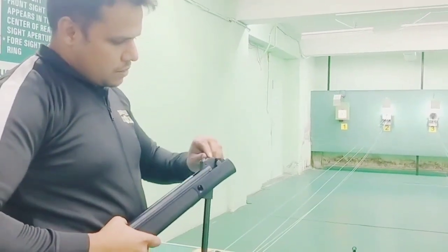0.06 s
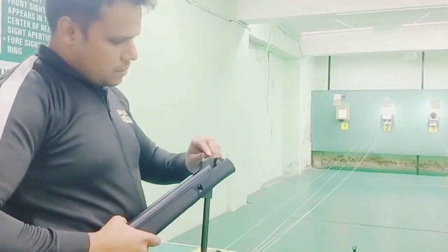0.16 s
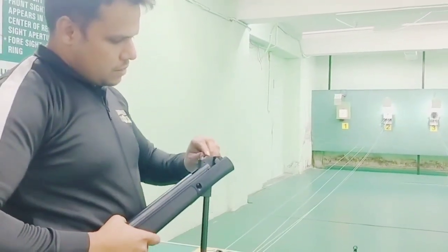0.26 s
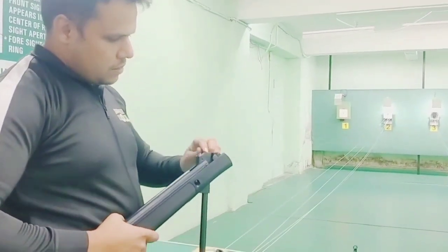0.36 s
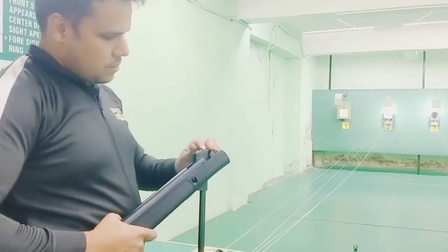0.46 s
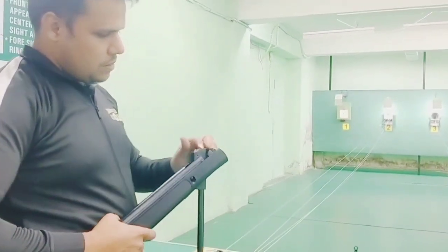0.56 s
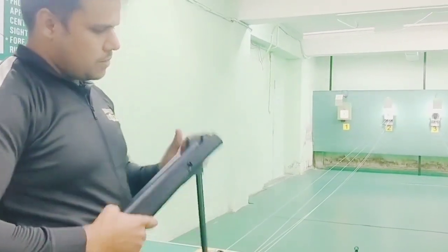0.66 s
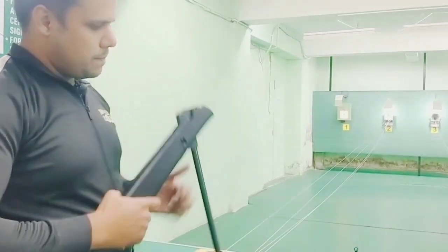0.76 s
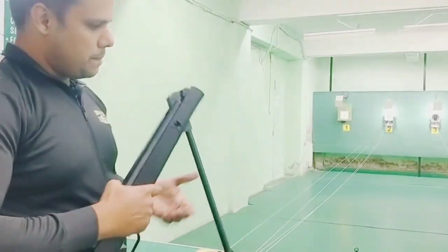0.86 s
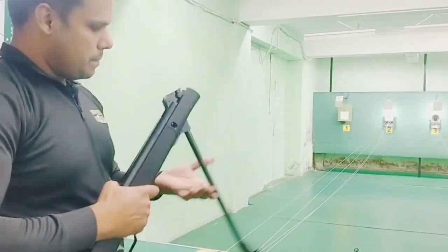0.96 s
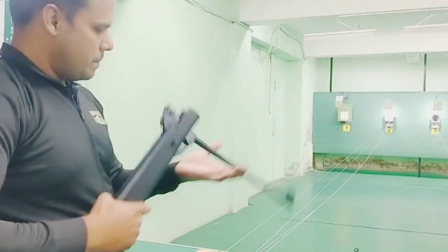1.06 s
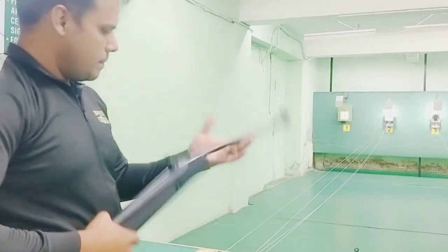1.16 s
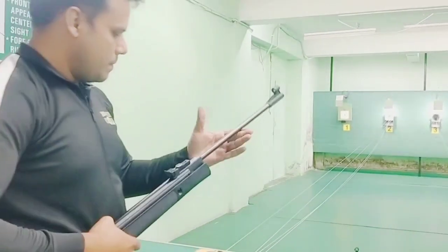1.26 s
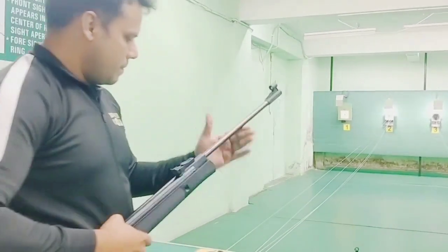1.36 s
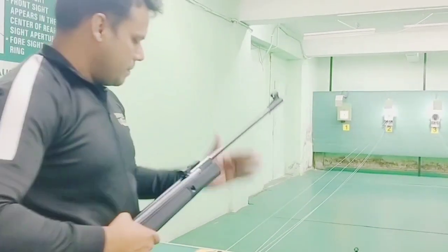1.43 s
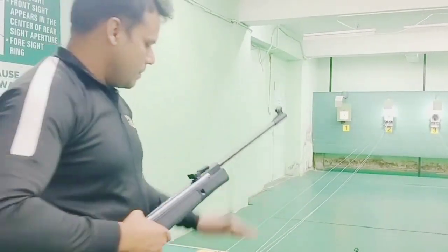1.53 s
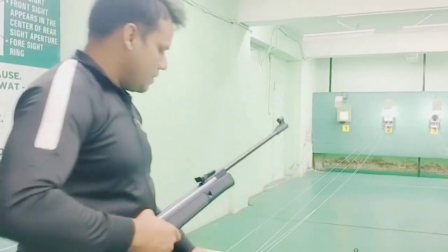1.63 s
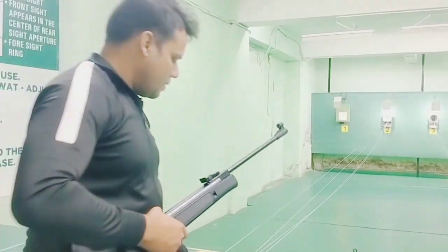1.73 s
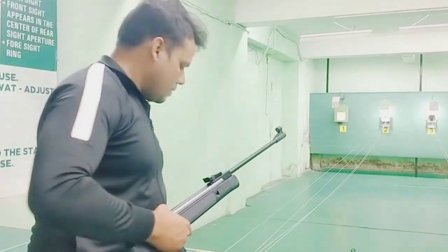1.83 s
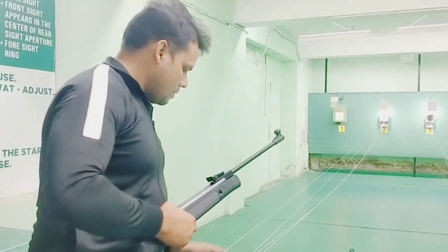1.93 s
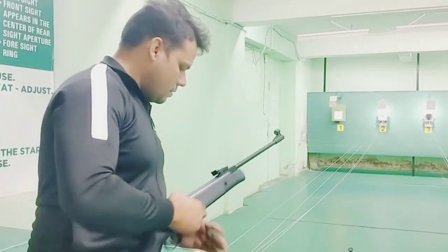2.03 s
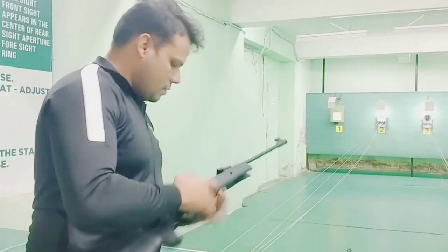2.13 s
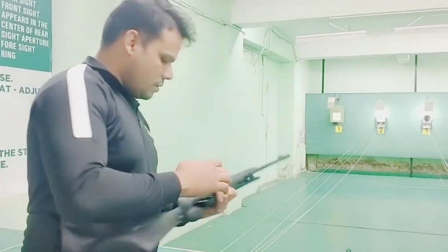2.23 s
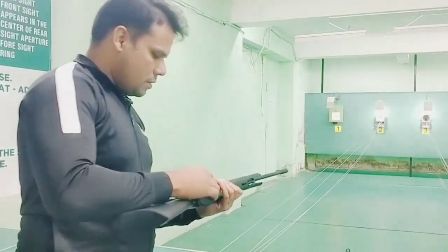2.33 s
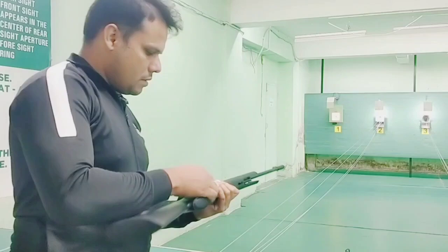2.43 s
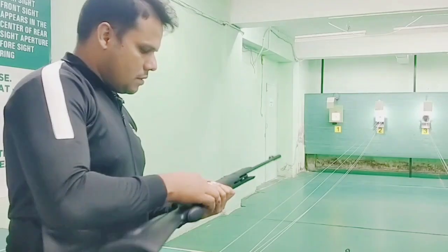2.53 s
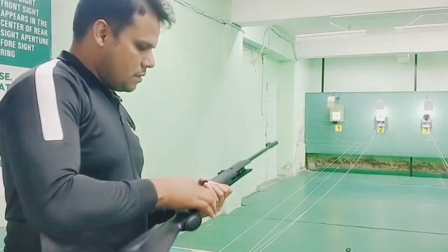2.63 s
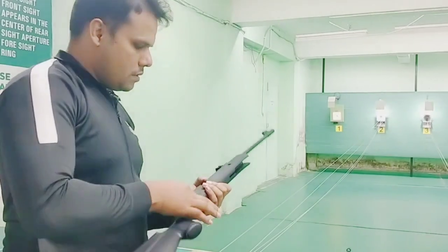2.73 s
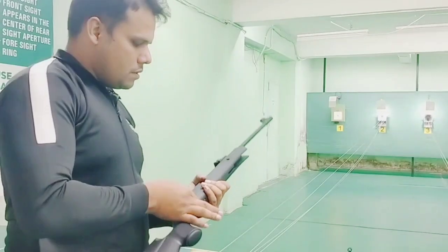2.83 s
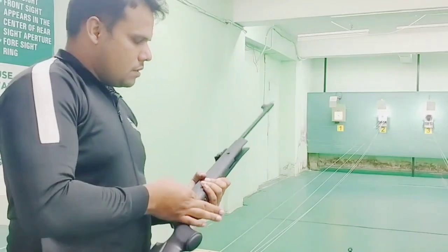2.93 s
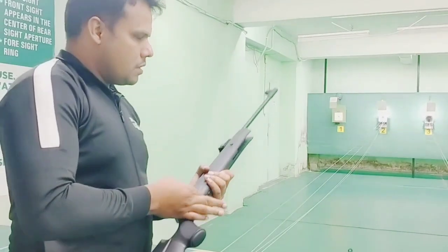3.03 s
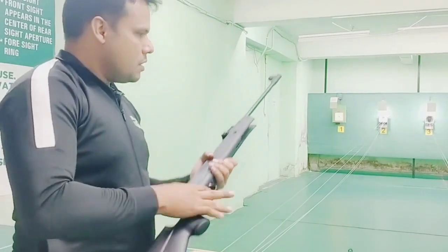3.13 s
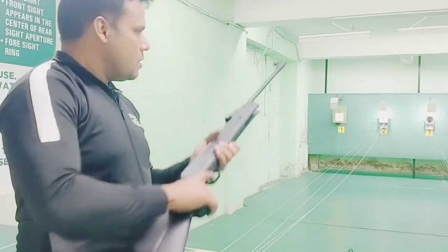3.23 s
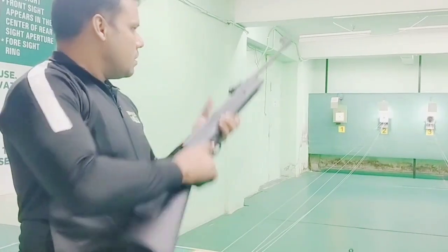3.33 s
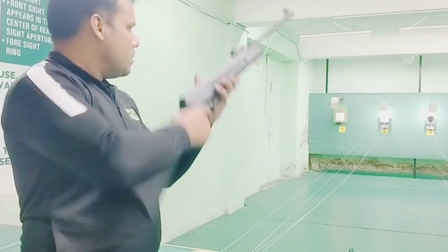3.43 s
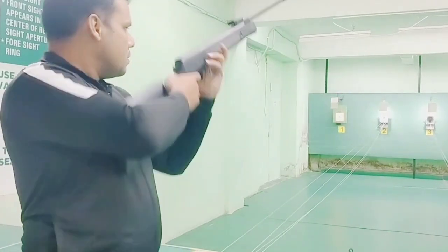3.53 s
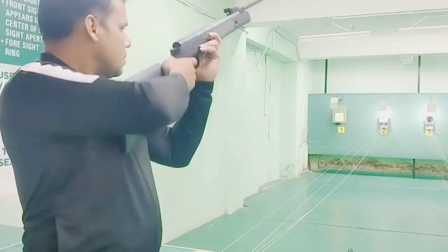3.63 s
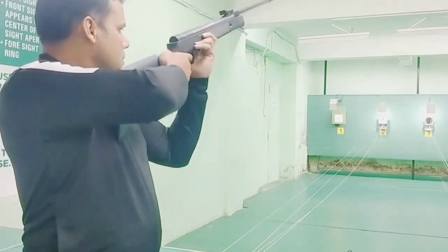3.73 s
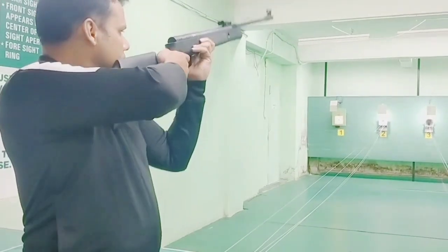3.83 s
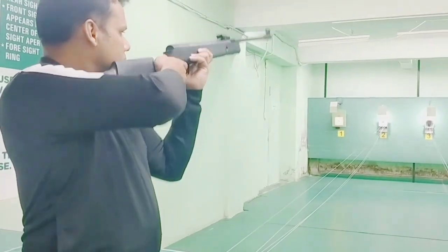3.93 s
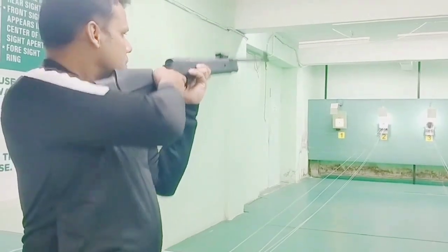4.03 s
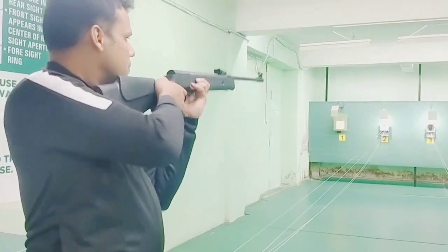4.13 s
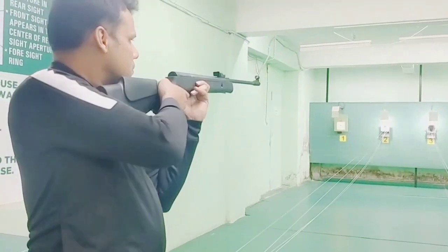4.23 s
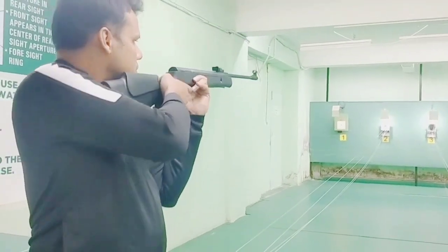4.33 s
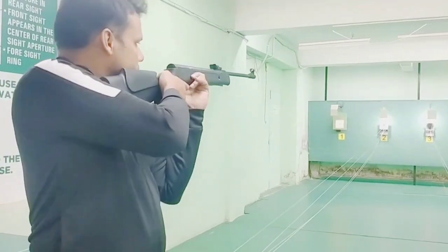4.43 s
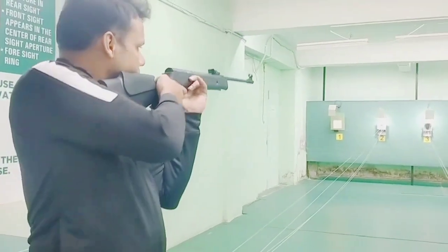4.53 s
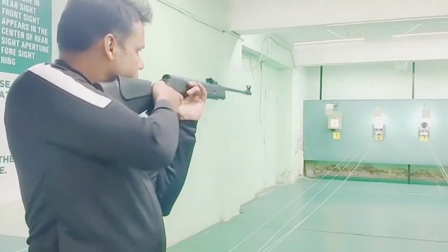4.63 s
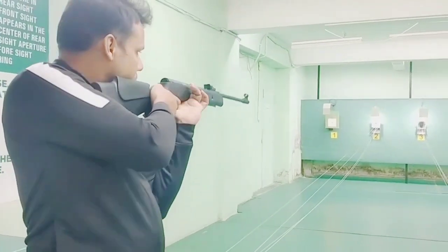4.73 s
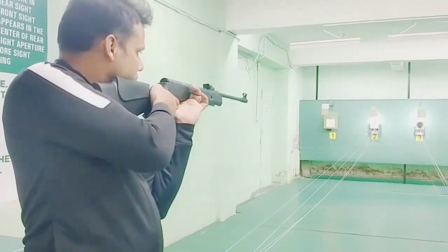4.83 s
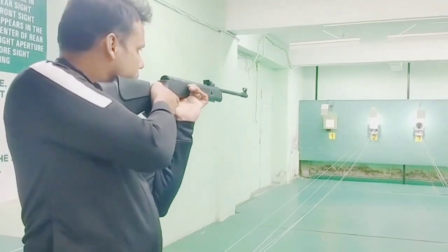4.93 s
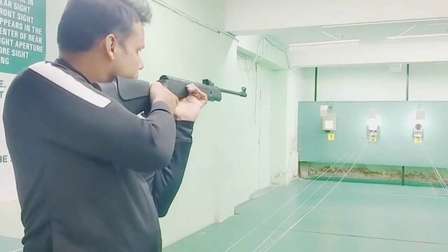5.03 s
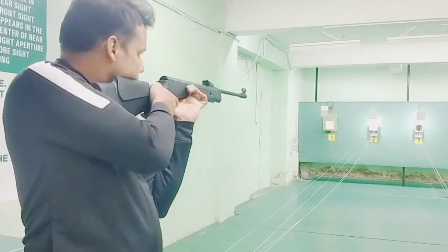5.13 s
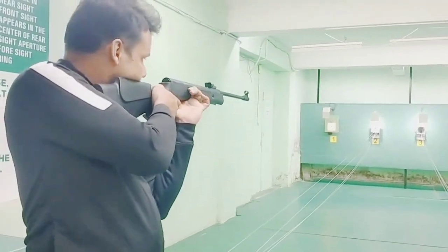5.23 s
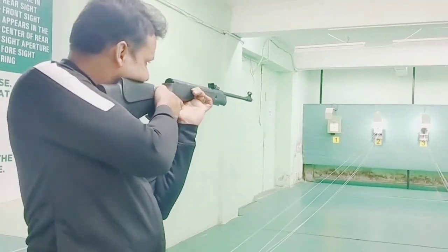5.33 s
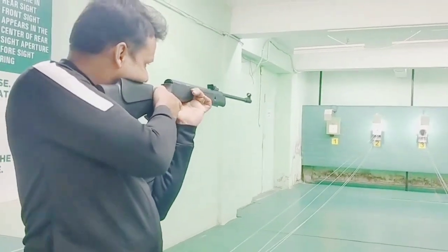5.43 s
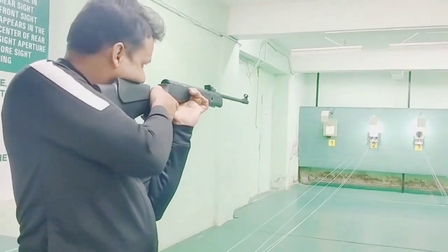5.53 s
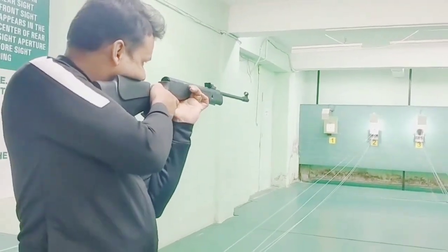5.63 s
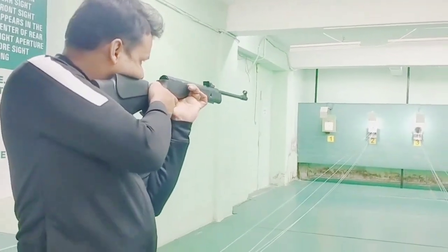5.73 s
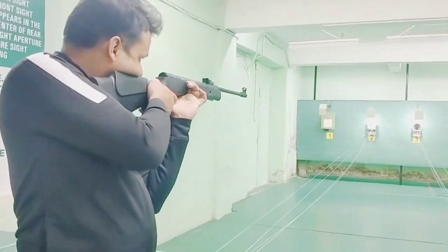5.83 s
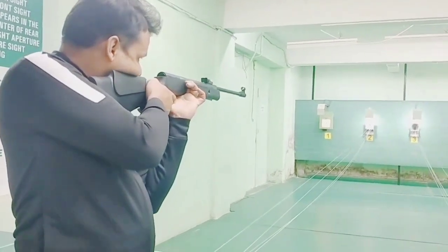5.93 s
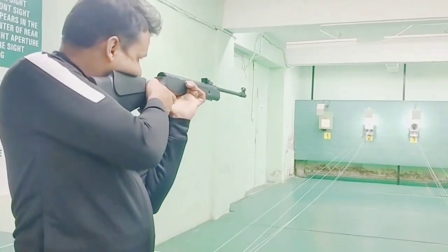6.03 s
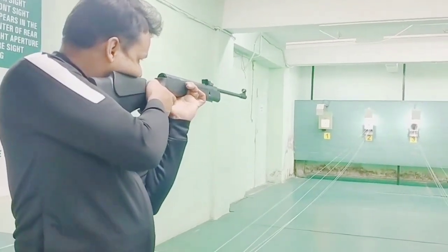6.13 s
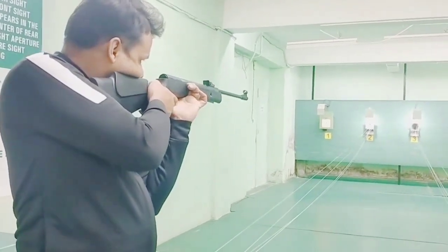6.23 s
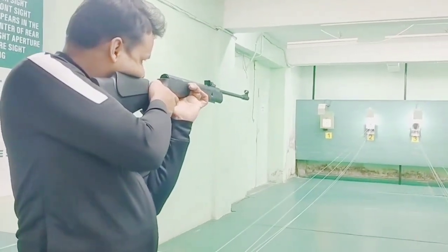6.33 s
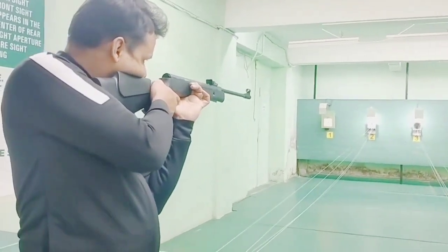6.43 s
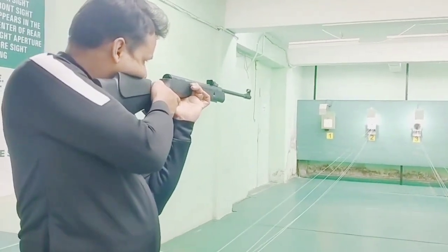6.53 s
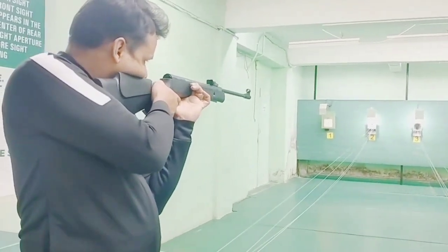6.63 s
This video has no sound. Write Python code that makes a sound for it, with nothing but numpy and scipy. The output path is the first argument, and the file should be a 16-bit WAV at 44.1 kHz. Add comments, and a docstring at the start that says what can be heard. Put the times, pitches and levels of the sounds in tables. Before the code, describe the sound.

A break-barrel air rifle snaps shut with a loud steel clack ringing through a bare hall, then a catch clicks and small sight clicks follow over throbbing fan hum.

```python
"""Over throbbing fans, motor hum and rushing air, a break-barrel spring air rifle is handled in a bare range.
Sleeves rustle and fittings tick, then the hinge squeaks (stick-slip pulses), the latch grinds (noise bursts)
and the barrel slams shut (cracks and chatter rung through steel resonances). A catch clicks, the stock bumps
the chest and fingers turn the rear sight four notches. Hands knock and slide on the stock throughout. Decaying
noise gives the handling sounds and the long ring of the hall, which sounds after all of them but the chest
bumps."""
import sys
import numpy as np
from scipy import signal
from scipy.fft import rfft, irfft
from scipy.io import wavfile

SR = 44100
rng = np.random.default_rng(int(sys.argv[2]) if len(sys.argv) > 2 else 0)


def materialize(psi):
    """Save the field psi as 16-bit PCM at rate SR to the path in sys.argv[1].

    A 1-D psi becomes a single channel; in a 2-D psi each row is a channel.
    """
    bounded = np.clip(np.atleast_2d(psi).T, -1, 1)
    quanta = np.round(bounded * 32767).astype(np.int16)
    wavfile.write(sys.argv[1], SR, quanta)


N = 294100
TIME = np.arange(N) / SR   # s

# All tilts act above 500 Hz. Body spectra are relative: each response is scaled to an energy of 1.
# Barrel meeting latch and breech: [t/s, level/dB, tilt/(dB/octave)]
LATCH_BLOWS = [(1.1595, -45, -2.5), (1.1651, -35, 2), (1.2951, -42, 2.5), (1.3125, -20, 2),
               (1.3194, -25, -0.5), (1.3264, -25, -0.5), (1.3334, -13, 2.5), (1.3411, -19.5, 2),
               (1.3644, -24, 0.5)]
# Tone of the whole rifle under a blow: [f/Hz, level/dB]
RIFLE_BODY = [(120, -11.5), (220, -19.5), (320, -4.5), (480, -3.5), (630, -9), (950, 0.5), (1800, -1.5),
              (2800, 0.5), (3300, -9.5), (4200, -7.5), (8200, -9), (9700, -17.5), (13000, -21),
              (15500, -16.5)]
# Steel resonances of the rifle: [f/Hz, width/Hz, peak/dB]
RIFLE_MODES = [(477, 52, 4.6), (880, 20, 4.4), (940, 18, 4), (1263.7, 20, 6.5), (1327, 20, 5),
               (1460, 20, 2.9), (1510, 30, 3.1), (1802, 13, 6), (1949, 25, 7.1), (2040, 28, 2.7),
               (2226, 90, 6.5), (2350, 66, 2.5), (2910, 21, 5.5), (8000, 210, 1.7)]
# Rings of the latch while it grinds over its ramp: [f/Hz, width/Hz, peak/dB]
RAMP_MODES = [(1480, 90, 8.5), (2443, 350, 9.5), (6900, 330, 3.5)]
# What the hinge radiates: [f/Hz, level/dB]
HINGE_BODY = [(400, -10.5), (1000, -10.5), (2400, -3.5), (3200, 0), (4500, -3), (6000, -5), (7000, 0),
              (8500, -12), (10000, -17), (11500, -14), (13000, -25), (15500, -24)]
# Catch snapping over: [t/s, level/dB, tilt/(dB/octave)]
CATCH_BLOWS = [(3.0634, -26, .5), (3.0697, -31, 1.5), (3.0842, -35, 7), (3.1040, -39, 2)]
# Tone of the catch: [f/Hz, level/dB]
CATCH_BODY = [(200, -14), (450, -15), (850, -21), (1400, -10), (1900, -14.5), (2700, -6.5), (4250, -1.5),
              (4900, -15.5), (6000, -9), (8800, -11.5), (11500, -14), (13500, -18), (15500, -27)]
# Resonances of the catch: [f/Hz, width/Hz, peak/dB]
CATCH_MODES = [(850, 89, 9.2), (2144, 140, 7.5), (2716, 260, 12.3), (2940, 96, 1.8), (3680, 260, 6.6),
               (4300, 73, 1.9), (5880, 590, 11.5), (7540, 250, 7.1), (11000, 600, 4.6)]
# Notches of the rear sight's wheel, alike but for the part that rings most: [t/s, main ring f/Hz]
NOTCHES = [(4.963, 3950), (5.4717, 6000), (5.944, 7830), (6.3396, 8380)]
# Small bright ticks of the fittings: [t/s, level/dB, tilt/(dB/octave), main ring f/Hz]
TICKS = [(.546, -60, 3, 8000), (.884, -55, -4, 7000), (1.916, -53, 8, 13000), (2.685, -48, 2.5, 7800),
         (2.798, -47.5, 2, 6050), (2.998, -48.5, 3, 3000), (3.394, -48, -0.5, 15000),
         (3.8721, -47, 0.5, 5780)]
# Tone of the small steel parts: [f/Hz, level/dB]
TICK_BODY = [(400, -21), (1500, -14.5), (2500, -8.5), (4500, -4), (5500, -7), (8500, -3), (10000, -7),
             (11500, -2), (13000, -8.5), (15500, -1.5)]
# Resonances the small parts share: [f/Hz, width/Hz, peak/dB]
TICK_MODES = [(2450, 190, 7.7), (5870, 610, 7.5), (7750, 700, 6)]
# Stock swung up against the chest: [t/s, level/dB, tilt/(dB/octave), t60/s]
CHEST_BUMPS = [(3.322, -46.5, 2, 0.73), (3.372, -47, -1, 0.28), (3.445, -49.5, -22, 0.51),
               (4.14, -68, 7, 0.25)]
# Dull thud of the chest: [f/Hz, level/dB]
CHEST_BODY = [(60, 14), (110, -4), (145, 15), (200, 5.5), (280, 4), (450, -20), (1500, -40), (8000, -61)]
# Fingers knocking on the stock: [t/s, level/dB, tilt/(dB/octave)]
GRIPS = [(.6086, -60, 6), (1.0072, -47, 4), (1.0565, -51.5, -3), (2.0615, -47.5, 1), (2.3061, -47.5, -5.5),
         (2.835, -53, 1), (2.978, -50.5, -1.5), (3.006, -50, 0), (3.0646, -39.5, -5.5),
         (4.3986, -56.5, 2.5), (5.0456, -53.5, -1), (5.1275, -52, 1.5), (5.1382, -52, 4.5)]
# Tone of the stock: [f/Hz, level/dB]
STOCK_BODY = [(200, -11.5), (450, -9.5), (700, -6), (1100, -1.5), (2700, -3), (3700, -4), (5000, -12),
              (7000, -16.5), (10000, -21.5), (15500, -22)]
# Palms sliding on the stock, each a swell and a fade: [t of the peak/s, level/dB, length/s]
PALM_SLIDES = [(.96, -66, 0.12), (2.30, -58, 0.11), (2.825, -57.5, 0.29), (3.02, -54.5, .09),
               (3.765, -62.5, .06), (4.115, -58.5, 0.13), (4.755, -65.5, 0.064), (5.765, -60.5, 0.094)]
# How briskly the arms move, as the level of the sleeves: [t/s, level/dB]
ARM_LEVELS = [(.3, -82.5), (.9, -67.5), (1.4, -61.5), (2.2, -66.5), (3.4, -64), (4.2, -67.5), (4.6, -78.5),
              (6.6, -86)]
# Single sweeps of a sleeve: [t of the peak/s, level/dB, length/s]
SLEEVE_SWEEPS = [(.56, -66.5, .1), (1.93, -58, 0.055), (2.09, -61, 0.048), (2.46, -60, 0.055),
                 (2.84, -69, 0.037), (3.69, -67, .08), (3.96, -62, 0.21), (4.12, -55, 0.14)]
# Tone of the cloth: [f/Hz, level/dB]
CLOTH_BODY = [(200, 2.5), (500, 3.5), (1200, 3.5), (3000, 5.5), (5000, 0.5), (8200, 4), (9500, -4),
              (15500, 1.5)]
# Fans at slightly different speeds: [f/Hz]
FAN_HZ = [41.22, 43.38, 45.55, 47.71]
# Their levels, in the same order: [rms level/dB]
FAN_DB = [-58.5, -52.5, -58, -60]
# Motor tones: [f/Hz]
HUM_HZ = [49.1, 70.1, 85.7, 138.4, 145.1, 196.5, 245.6, 300.2, 991, 4400]
# Their levels before the waver, in the same order: [rms level/dB]
HUM_DB = [-62, -73, -72.5, -69, -68, -69.5, -60.5, -70.5, -86, -90]
# Moving air before its patchiness: [f/Hz, level/(dB per Hz)]
AIR_SPECTRUM = [(12, -79.5), (26, -75.5), (55, -78), (110, -85), (150, -86), (280, -89.5), (400, -95.5),
                (550, -103), (1200, -108), (2500, -111), (5000, -117), (8200, -117), (9800, -124),
                (15500, -123)]
# Duct resonances: [f/Hz, width/Hz, peak/dB]
DUCT_MODES = [(146, 9.8, 4.3), (1066, 34, 5.8), (4270, 104, 3.7)]
# Decay of the hall: [f/Hz, t60/s]
HALL_DECAY = [(150, 1.6), (330, 3), (470, 2.3), (680, 1.8), (1200, 1.155), (2400, 1.44), (5000, 1.41),
              (8000, 1.11), (11000, 0.8), (13500, 0.48), (15500, 0.62)]

# The hinge squeaks until the latch drags; the drag lasts until the barrel is shut.
SQUEAK_FROM_S, SQUEAK_TO_S, SHUT_S = 1.09, 1.165, 1.31
SQUEAK_FADE_S = 0.021   # fade of both squeak and drag


def barrel_slam(rooms):
    """The barrel strikes latch and breech; each blow and its rebound shake the whole steel rifle."""
    table = rebounding(LATCH_BLOWS)
    return blows(table, RIFLE_BODY, RIFLE_MODES, rooms, crack=2.3, grain_db=4.0, wet_db=0.56)


def latch_ramp():
    """The latch grinds over its ramp, hardest at first, and drags until it shuts, ringing as it goes."""
    grind = from_db(-45.5) * stroke(1.2, length_s=.04)
    drag = from_db(-58.5) * held(SQUEAK_TO_S, SHUT_S, SQUEAK_FADE_S)
    return friction(grind + drag, body(HINGE_BODY, RAMP_MODES), grain_db=-0.5)


def hinge_squeak():
    """The dry pivot sticks and slips ever faster as the barrel speeds up: a faint rising squeak."""
    start_slips_per_s, octaves_per_s = 850, 12
    jitter, scrape, level_db = .02, .8, -59.5
    elapsed = np.clip(TIME, SQUEAK_FROM_S, SQUEAK_TO_S) - SQUEAK_FROM_S
    slips_per_s = start_slips_per_s * 2 ** (octaves_per_s * elapsed)
    slip_count = np.cumsum(slips_per_s * (1 + jitter * drift(400))) / SR
    # One pulse each time the count passes a whole number
    slips = rms_one(np.diff(np.floor(slip_count), prepend=0))
    force = slips + scrape * rng.standard_normal(N)
    envelope = from_db(level_db) * held(SQUEAK_FROM_S, SQUEAK_TO_S, SQUEAK_FADE_S)
    return through(force * envelope, body(HINGE_BODY))


def catch_click(rooms):
    """The catch snaps over and rebounds, with a rough chatter and little crack."""
    table = rebounding(CATCH_BLOWS)
    return blows(table, CATCH_BODY, CATCH_MODES, rooms, crack=0.55, grain_db=11.0, wet_db=3.0)


def sight_wheel(room):
    """The rear sight's wheel drops into four notches, each with its own main ring."""
    level_db, tilt_db = -52, -0.5
    table = [(s, level_db, tilt_db, ring_hz) for s, ring_hz in NOTCHES]
    return fittings(table, room, crack=2.4, ring_width_hz=420, ring_db=4.5, wet_db=4.5)


def fitting_ticks(room):
    """Small steel fittings knock together: short, bright ticks."""
    return fittings(TICKS, room, crack=1.5, ring_width_hz=550, ring_db=3.5, wet_db=4.5)


def chest_bumps():
    """The stock meets the chest: soft dying noise with no crack, left without hall."""
    return contacts(CHEST_BUMPS, CHEST_BODY, (), crack=0)


def finger_grips(room):
    """Fingers knock on the stock: a crack and a short chatter."""
    t60_s = .033
    table = [(*grip, t60_s) for grip in GRIPS]
    return blows(table, STOCK_BODY, (), [room], crack=3.6, grain_db=3.0, wet_db=1.0)


def palms():
    """Palms slide on the stock: grainy friction through a slightly dulled stock."""
    return friction(strokes(PALM_SLIDES), body(STOCK_BODY, tilt_db=-2.5), grain_db=3.5)


def sleeves():
    """Cloth rustles while the arms move, louder in each sweep."""
    s, db = np.transpose(ARM_LEVELS)
    movement = from_db(np.interp(TIME, s, db))
    return friction(movement + strokes(SLEEVE_SWEEPS), body(CLOTH_BODY), grain_db=1.5)


def fans():
    """The fans beat against each other about twice a second, over motor tones and moving air."""
    in_step_s = .42   # the moment when all the fans line up
    waver_db, patchy_db = 0.66, 2.43
    throb, hum = 0, 0
    for hz, db in zip(FAN_HZ, FAN_DB):
        throb = throb + from_db(db) * np.cos(2 * np.pi * hz * (TIME - in_step_s))
    for hz, db in zip(HUM_HZ, HUM_DB):
        level = from_db(db + waver_db * drift(3.3))
        hum = hum + level * np.sin(2 * np.pi * (hz * TIME + rng.random()))
    colour = from_db(shape_db(AIR_SPECTRUM, DUCT_MODES, np.arange(N // 2 + 1) * SR / N))
    air = irfft(rfft(rng.standard_normal(N)) * colour, N) * np.sqrt(SR / 2)
    # sqrt(2) turns rms levels into peak levels
    return np.sqrt(2) * (throb + hum) + air * from_db(patchy_db * drift(6))


def hall(count=16):
    """Near walls answer within milliseconds, the far wall adds a later swell, the tail dies band by band."""
    early_db, early_t60_s, late_db = -39.0, 0.25, -40.5
    far_wall_db, far_wall_s = -20, 0.23   # dB relative to the tail
    age = TIME[:2 * SR]
    hz = np.arange(SR + 1) / 2
    white = rfft(rng.standard_normal(2 * SR))
    centres = np.geomspace(120, 16000, count)
    arrival = np.clip(age / 0.0018 - 1, 0, 1)   # silent for 1.8 ms, full at 3.6 ms
    far_wall = from_db(far_wall_db) * np.exp(-((age - far_wall_s) / 0.019) ** 2)
    early = from_db(early_db) * np.exp(-np.log(1000) * age / early_t60_s)
    out = 0
    for centre, pick in zip(centres, np.eye(count)):
        band = irfft(white * np.interp(hz, centres, pick))
        decay = np.exp(-np.log(1000) * age / at_hz(HALL_DECAY, centre))
        tail = from_db(late_db) * (1 + far_wall) * decay
        out = out + band * (tail + early)
    return out * arrival


def blows(table, spectrum, modes, rooms, crack, grain_db, wet_db):
    """Contacts radiate in different directions, so they take turns to wake different echoes."""
    out = 0
    for k, room in enumerate(rooms):
        direct = contacts(table[k::len(rooms)], spectrum, modes, crack, grain_db)
        out = out + direct + from_db(wet_db) * through(direct, room)
    return out


def fittings(table, room, crack, ring_width_hz, ring_db, wet_db):
    """Each small steel part adds a bright ring of its own."""
    t60_s = .03
    direct = 0
    for *tick, ring_hz in table:
        modes = TICK_MODES + [(ring_hz, ring_width_hz, ring_db)]
        direct = direct + contacts([(*tick, t60_s)], TICK_BODY, modes, crack)
    return direct + from_db(wet_db) * through(direct, room)


def rebounding(table):
    """Each blow dies fast, then the parts rebound softer, duller and longer: (s, dB, tilt, t60 s)."""
    blow_t60_s, rebound_t60_s = 0.027, .065
    delay_s, drop_db, tilt_change_db = .004, -6.5, -2
    first = [(s, db, tilt, blow_t60_s) for s, db, tilt in table]
    second = [(s + delay_s, db + drop_db, tilt + tilt_change_db, rebound_t60_s) for s, db, tilt in table]
    return first + second


def contacts(table, spectrum, modes, crack, grain_db=0, size=8192):
    """Each contact is one crack and a dying, uneven chatter of the parts, rung through the body."""
    out, age = np.zeros(N + 2 * size), TIME[:size]
    for s, db, tilt_db, t60 in table:
        chatter = rms_one(rng.standard_normal(size) * from_db(grain_db * drift(600, size=size)))
        force = chatter * from_db(-60 * age / max(t60, .003))
        force[0] += crack
        at = round(s * SR)
        ringing = signal.fftconvolve(force, body(spectrum, modes, tilt_db))
        out[at:at + 2 * size - 1] += from_db(db) * ringing
    return out[:N]


def friction(strength, response, grain_db):
    """Surfaces catch and let go in clumps: noise of drifting level, rung through the body."""
    clumps = rms_one(rng.standard_normal(N) * from_db(grain_db * drift(250)))
    return through(clumps * strength, response)


def stroke(s, length_s):
    """A movement swells to its peak and fades slightly more slowly."""
    rise_share = .45   # of the length
    share = np.where(TIME < s, rise_share, 1 - rise_share)
    return np.exp(-2 * np.abs(TIME - s) / (length_s * share))


def strokes(table):
    """The summed strength of a row of movements."""
    return sum(from_db(db) * stroke(s, length_s) for s, db, length_s in table)


def held(start, stop, fade_s):
    """Attack, hold, release; half strength at start and stop."""
    return np.clip(np.minimum(TIME - start, stop - TIME) / fade_s + .5, 0, 1)


def body(spectrum, modes=(), tilt_db=0, size=8192):
    """Causal (minimum-phase) response of a body to one click; energy 1."""
    hz = np.arange(size // 2 + 1) * SR / size
    octaves = np.log2(np.maximum(hz, 500))   # the tilt starts at 500 Hz
    cepstrum = irfft(np.log(from_db(shape_db(spectrum, modes, hz) + tilt_db * octaves)))
    # Folding the cepstrum onto positive times makes the phase minimal
    cepstrum[0], cepstrum[size // 2:] = 0, 0
    response = irfft(np.exp(rfft(2 * cepstrum)))
    return response / np.linalg.norm(response)


def through(x, response):
    """Plays a sound through a body or a room."""
    return signal.fftconvolve(x, response)[:N]


def shape_db(spectrum, modes, hz):
    """A broad spectrum with resonance peaks on top."""
    peaks = sum(db / (1 + (2 * (hz - centre) / width) ** 2) for centre, width, db in modes)
    return at_hz(spectrum, hz) + peaks


def at_hz(points, hz):
    """Reads a table along a log-frequency axis."""
    table_hz, values = np.transpose(points)
    return np.interp(np.log(np.maximum(hz, 1)), np.log(table_hz), values)


def drift(rate, size=N):
    """Slow chance with a spread near 1: random knots, rate per second, joined by lines."""
    knots = rng.standard_normal(size // 40)
    return np.interp(TIME[:size] * rate, np.arange(len(knots)), knots)


def from_db(db):
    """Decibels to gain."""
    return 10 ** (np.asarray(db) / 20)


def rms_one(x):
    """Scales to an rms of 1."""
    return x / np.sqrt(np.mean(x ** 2) + 1e-20)


def scene(count=5):
    """The rifle, the hands and the fans in the hall, the same in both channels."""
    rooms = [hall() for _ in range(count)]   # alike in character, each with its own echoes
    room = rooms[0]
    rifle = barrel_slam(rooms) + catch_click(rooms) + sight_wheel(room) + fitting_ticks(room)
    knocks = chest_bumps() + finger_grips(room)
    rubbing = latch_ramp() + hinge_squeak() + palms() + sleeves()
    rubbing = rubbing + from_db(-3) * through(rubbing, room)
    mono = rifle + knocks + rubbing + fans()
    return np.stack([mono, mono])


def record(dry):
    """A steep elliptic low-pass cuts the top above 15.8 kHz."""
    low_pass = signal.ellip(12, .1, 80, 15800, fs=SR, output="sos")
    return signal.sosfilt(low_pass, dry)


dry = scene()
out = record(dry)
materialize(out)
```